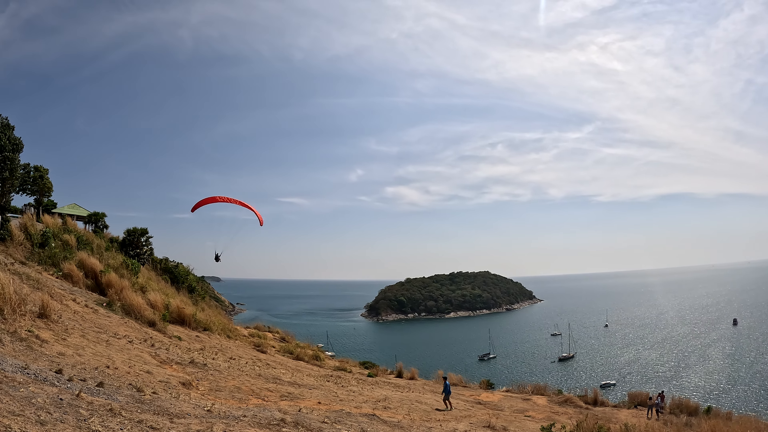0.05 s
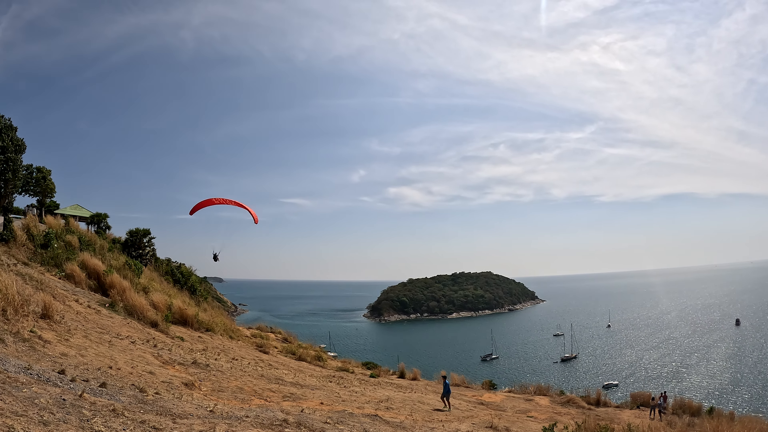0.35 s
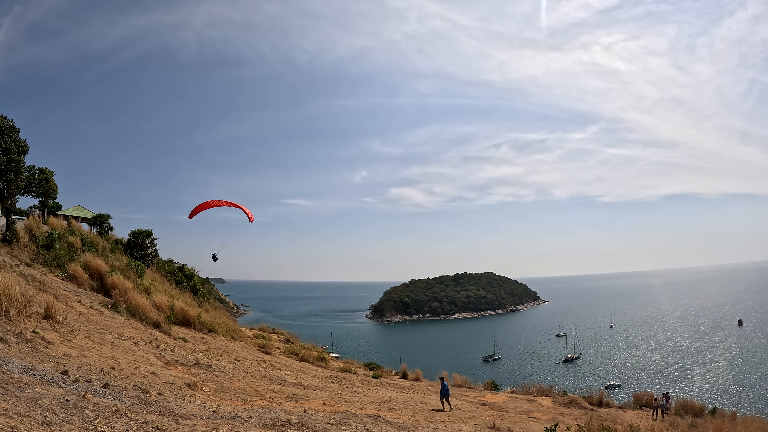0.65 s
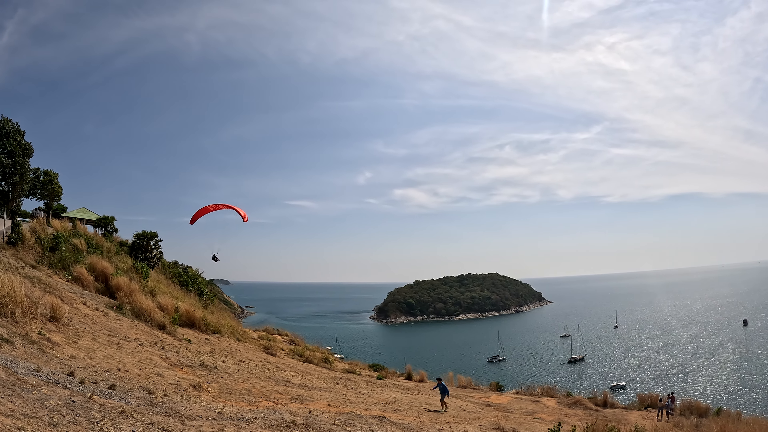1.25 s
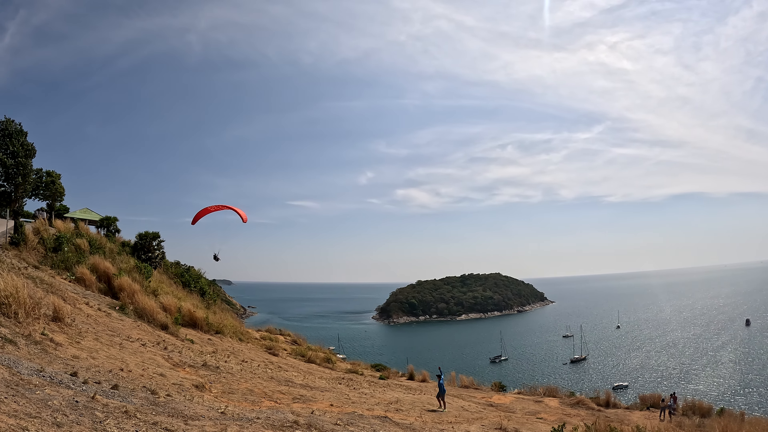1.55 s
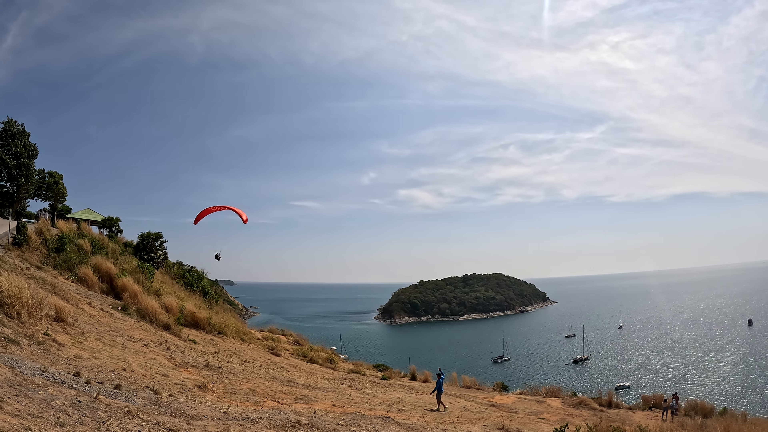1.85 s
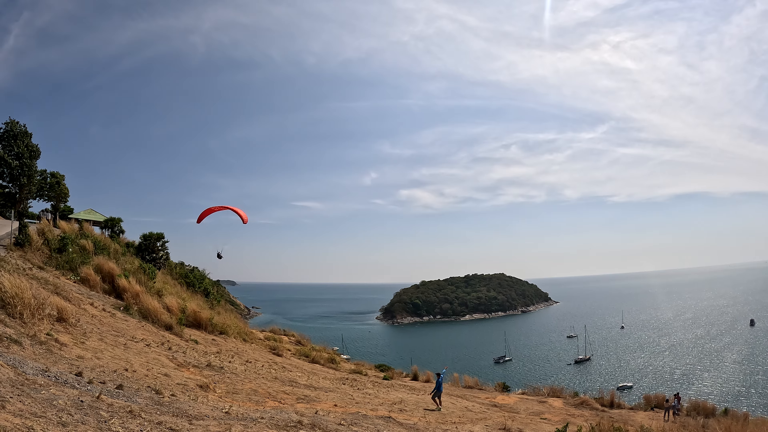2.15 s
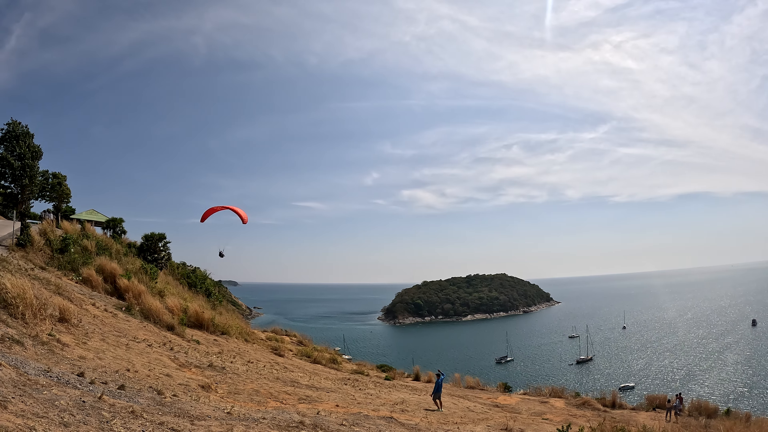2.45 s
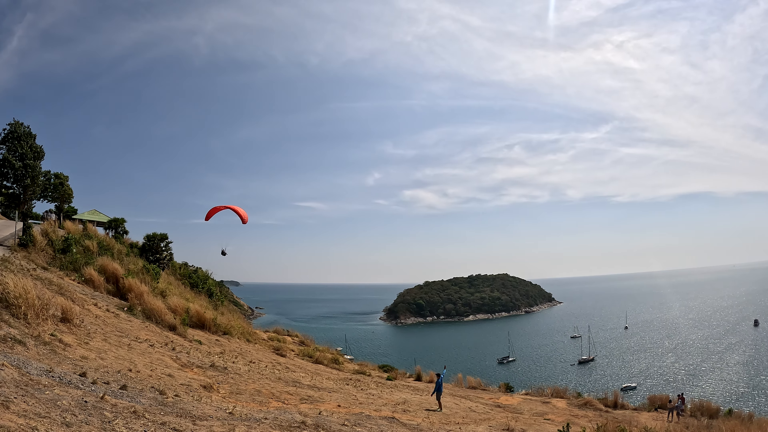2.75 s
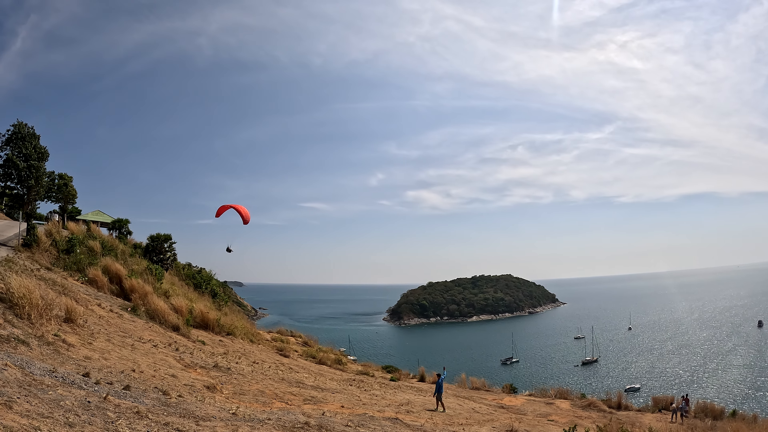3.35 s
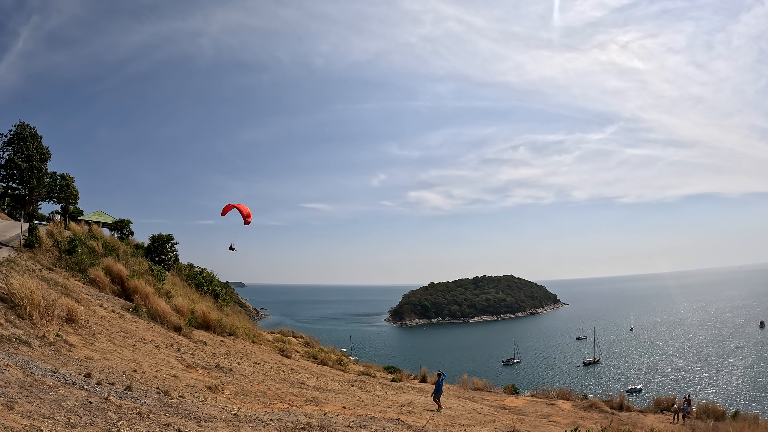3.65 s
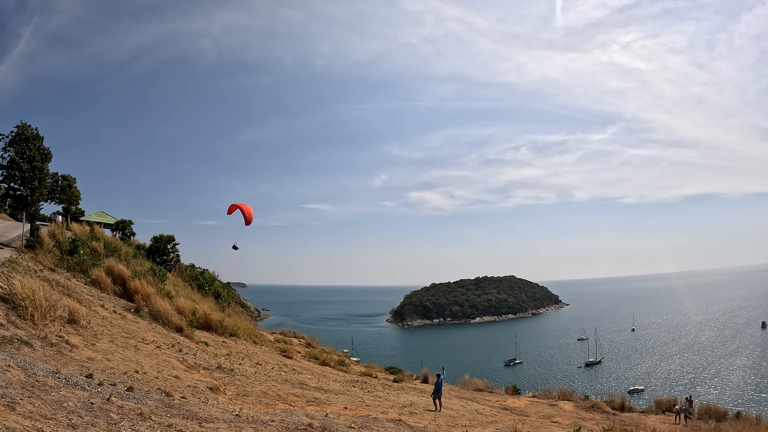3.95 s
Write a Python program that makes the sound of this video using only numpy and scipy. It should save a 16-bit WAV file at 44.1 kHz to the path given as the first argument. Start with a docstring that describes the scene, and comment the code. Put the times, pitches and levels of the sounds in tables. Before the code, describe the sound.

Low wind buffeting flutters and thumps on the microphone above a faint, distant sea hiss.

```python
"""Low, gusty wind rumble buffets a microphone on an open hillside above a bay.
Large eddies rumble at the microphone port throughout; each gust adds smaller, brighter ones
that flutter and now and then snap or thump. A faint hiss of sea and dry grass lies behind.
The cavity behind the port rings faintly, and a limiter holds the peaks down."""
import sys
import numpy as np
from scipy import signal
from scipy.io import wavfile
from scipy.ndimage import uniform_filter1d, minimum_filter1d

SR = 44100
rng = np.random.default_rng(int(sys.argv[2]) if len(sys.argv) > 2 else 0)


def inscribe(sig):
    """Save sig as 16-bit PCM at rate SR to the path in sys.argv[1].

    A 1-D sig is mono; a 2-D sig holds one channel per row.
    Samples are clipped to [-1, 1] before scaling.
    """
    pcm = np.round(np.clip(np.atleast_2d(sig).T, -1, 1) * 32767)
    wavfile.write(sys.argv[1], SR, pcm.astype(np.int16))


N = 176400
SNAP_RISE_S = 0.00143


def from_db(db):
    """Decibels to gain."""
    return 10 ** (np.asarray(db) / 20)


def unit_rms(x):
    """Scale to unit rms."""
    return x / np.sqrt(np.mean(x ** 2) + 1e-20)


def in_time(rows):
    """Interpolate (time [s], value) rows at every sample."""
    return np.interp(np.arange(N) / SR, *np.transpose(rows))


def at_hz(rows, hz):
    """Interpolate (frequency [Hz], value) rows on a log-frequency axis."""
    row_hz, values = np.transpose(rows)
    return np.interp(np.log(hz), np.log(row_hz), values)


def drift(rate_hz):
    """Smooth random curve, unit rms, computed at SR / 10."""
    pole = np.exp(-20 * np.pi * rate_hz / SR)
    white = rng.standard_normal(N // 10 + 4002)
    slow = signal.lfilter([1], [1, -2 * pole, pole * pole], white)[4000:]
    return np.interp(np.arange(N) / 10, np.arange(len(slow)), unit_rms(slow))


def bands(spectrum):
    """Yield (centre [Hz], noise) in half-octave bands across a spectrum; total power one."""
    grid_hz = 14 * 2 ** np.arange(0, 10, .5)
    centres_hz = grid_hz[(grid_hz > spectrum[0][0] / 2 ** .25) & (grid_hz < spectrum[-1][0] * 2 ** .25)]
    gains = from_db(at_hz(spectrum, centres_hz)) * np.sqrt(centres_hz)
    for hz, gain in zip(centres_hz, gains / np.linalg.norm(gains)):
        band = signal.butter(2, [hz / 1.24, hz * 1.24], "band", fs=SR, output="sos")
        white = rng.standard_normal(N + SR // 2)
        noise = signal.sosfilt(band, signal.sosfilt(band, white))[-N:]
        yield hz, gain * unit_rms(noise)


def evened(x, span_s):
    """Flatten swells slower than span_s; unit rms."""
    size = int(span_s * SR)
    power = uniform_filter1d(uniform_filter1d(x * x, size), size)
    return unit_rms(x / np.sqrt(power + 1e-12))


def large_eddies():
    """Slow pressure lumps on the port: deep rumble and low-mid buffeting."""
    # spectra: (frequency [Hz], relative density [dB])
    rumble_spectrum = [(14, -8.5), (28, 1.5), (45, 1), (75, -0.5), (110, -1), (150, -10)]
    buffet_spectrum = [(110, -7), (160, 1.5), (230, 0.5), (320, -3), (450, -9), (600, -27.5)]
    # envelopes: (time [s], relative level [dB])
    rumble_level = [(0.0, -26.5), (0.14, -19), (0.18, -32), (0.23, -21), (0.59, -25.5), (0.61, -19),
                    (0.92, -26.5), (0.93, -22), (1.38, -22.5), (1.57, -26.5), (1.78, -20), (1.81, -24.5),
                    (1.95, -19.5), (1.98, -24.5), (2.02, -17.5), (2.09, -31.5), (2.13, -22), (3.11, -22.5),
                    (3.19, -21), (3.25, -26.5), (3.32, -20), (3.36, -30.5), (3.42, -22.5), (3.88, -21.5),
                    (3.9, -26), (3.98, -16.5)]
    buffet_level = [(0.0, -21.5), (0.08, -25.5), (0.1, -18.5), (0.34, -27), (0.35, -20.5), (0.91, -18.5),
                    (1.05, -23.5), (1.14, -18), (1.16, -27.5), (1.2, -18), (1.3, -28), (1.34, -23.5),
                    (1.5, -22), (1.52, -19), (1.62, -19.5), (1.72, -20), (1.95, -19.5), (1.99, -40),
                    (2.06, -21), (2.11, -38), (2.13, -21), (2.23, -25), (2.27, -28), (2.31, -20),
                    (2.6, -22), (2.62, -20.5), (3.06, -20.5), (3.2, -20), (3.295, -26), (3.32, -21),
                    (3.36, -16.5), (3.41, -24), (3.55, -21), (3.67, -22.5), (3.74, -20.5), (3.98, -26)]
    rumble = evened(sum(noise for _, noise in bands(rumble_spectrum)), span_s=0.04)
    buffet = evened(sum(noise for _, noise in bands(buffet_spectrum)), span_s=0.05)
    return rumble * from_db(in_time(rumble_level) + 2) + buffet * from_db(in_time(buffet_level) - 0.5)


def small_eddies():
    """Brighter turbulence that follows the wind: fluttering in gusts, smoother in lulls."""
    # wind strength at the port: (time [s], relative level [dB])
    gusts = [(0.0, -38), (0.02, -26), (0.05, -42), (0.1, -34.5), (0.29, -42.5), (0.33, -33), (0.35, -42),
             (0.38, -32.5), (0.4, -41), (0.43, -33.5), (0.54, -36.5), (0.59, -31.5), (0.85, -33),
             (0.89, -37), (0.92, -32), (0.93, -42), (1.01, -30.5), (1.04, -41), (1.12, -33), (1.13, -31),
             (1.16, -45.5), (1.2, -37), (1.25, -41), (1.315, -51.5), (1.34, -39), (1.38, -38.5),
             (1.4, -44.5), (1.45, -35), (1.47, -41.5), (1.54, -32.5), (1.65, -32), (1.725, -29.5),
             (1.78, -33.5), (1.85, -36.5), (1.88, -32), (1.95, -34.5), (2.05, -40.5), (2.07, -38.5),
             (2.115, -47), (2.14, -31.5), (2.19, -33.5), (2.275, -42), (2.295, -30), (2.35, -34.5),
             (2.37, -40.5), (2.39, -34), (2.43, -30.5), (2.45, -33), (2.53, -33.5), (2.55, -42),
             (2.6, -33.5), (2.62, -35.5), (2.68, -41.5), (2.74, -38.5), (2.88, -33), (3.0, -34.5),
             (3.06, -29.5), (3.085, -31.5), (3.1, -37.5), (3.135, -46), (3.165, -33), (3.25, -35.5),
             (3.265, -44), (3.32, -42), (3.335, -33), (3.37, -28.5), (3.4, -52), (3.45, -35.5),
             (3.465, -43), (3.505, -30), (3.56, -38), (3.58, -33.5), (3.63, -33.5), (3.65, -43),
             (3.685, -42.5), (3.72, -33.5), (3.77, -31), (3.82, -36.5), (3.87, -29.5), (3.98, -31.5)]
    # spectrum at middling wind: (frequency [Hz], relative density [dB])
    spectrum = [(300, 0.5), (450, 3.5), (630, 1), (900, -7), (1300, -17), (1800, -26.5), (2600, -34.5),
                (3600, -43.5), (5000, -54)]
    # gust sensitivity: (frequency [Hz], slope [dB/dB])
    swing = [(300, 1), (550, 0.86), (900, 1.5), (1600, 1.5), (3000, 0.8), (5000, 0)]
    # flutter at middling wind and above: (frequency [Hz], depth [dB])
    flutter_depth = [(300, 1.5), (700, 5), (1500, 4), (3000, 3)]
    # treble shelf: (time [s], gain [dB])
    treble_level = [(0, 4), (.25, 3.5), (.5, -1), (.7, -0.5), (.85, -0.5), (1.5, 2), (1.65, 0.5),
                    (1.76, 5.5), (1.86, 1.5), (2.02, 4), (2.15, -1.5), (2.35, -3.5), (2.48, -4.5),
                    (2.66, -7), (2.92, -2), (3.06, 1), (3.4, 0), (3.6, -1.5), (3.73, 1.5), (3.82, -1),
                    (3.95, 2.5)]
    middling_db, base_db, flutter_db_per_db = -33.5, -25.5, 0.2
    gust_db = in_time(gusts) - middling_db
    treble_db = in_time(treble_level)
    flutter = drift(rate_hz=174)
    flutter = unit_rms(flutter - uniform_filter1d(flutter, size=1400))  # fast part only
    flutter = np.minimum(flutter, 2) * from_db(flutter_db_per_db * np.minimum(gust_db, 0))
    out = np.zeros(N)
    for hz, noise in bands(spectrum):
        flutter_gain = from_db(at_hz(flutter_depth, hz) * flutter)
        bursts = noise.std() * evened(noise * flutter_gain, span_s=.07)
        treble_share = at_hz([(1200, 0), (2000, 1)], hz)
        level_db = base_db + at_hz(swing, hz) * gust_db + treble_share * treble_db
        out += bursts * from_db(level_db)
    return out


def sea_and_grass():
    """Smooth far hiss; each band wavers slightly."""
    # hiss spectrum: (frequency [Hz], relative density [dB])
    spectrum = [(700, 13), (1500, -2.5), (2500, -8.5), (3400, -3.5), (4800, -7.5), (7000, -13), (9000, -18),
                (10500, -22)]
    # hiss envelope: (time [s], relative level [dB])
    level = [(0.06, -72), (0.13, -69), (0.35, -70), (0.77, -70), (0.8, -70), (0.83, -71.5), (1.55, -68),
             (1.6, -71.5), (2.12, -67), (2.43, -73.5), (2.85, -67.5), (2.96, -72), (3.44, -68), (3.95, -72)]
    hiss = sum(noise * from_db(0.34 * drift(rate_hz=9.7)) for _, noise in bands(spectrum))
    return hiss * from_db(in_time(level) + 14)


def puff(sos):
    """Filtered turbulence burst, a few milliseconds long; unit rms over its body."""
    t = np.arange(SR // 50) / SR
    burst = signal.sosfilt(sos, rng.standard_normal(len(t)) * t * np.exp(-t / SNAP_RISE_S))
    return burst / np.sqrt(np.sum(burst ** 2) / (2 * SNAP_RISE_S * SR))


def snaps():
    """The sharpest eddies snap across the port: a dull puff topped with thin, bright fizz."""
    # snaps: (time [s], relative puff level [dB], upper corner [Hz], relative fizz level [dB])
    events = [(0.021, -23, 2850, -66), (0.033, -24.5, 3240, -61), (0.101, -29, 2300, -64),
              (0.115, -30.5, 2000, -70), (0.335, -36, 2120, -59), (0.37, -29, 1980, -57),
              (0.434, -32.5, 1700, -72), (0.615, -22, 1410, -64), (0.676, -32, 1700, -68),
              (0.802, -28.5, 2000, -43.5), (0.835, -32, 1590, -57), (0.851, -24, 1470, -59),
              (0.856, -32, 1800, -50), (0.916, -28.5, 2000, -61.5), (0.999, -29, 1610, -61),
              (1.129, -25.5, 2180, -57), (1.14, -28.5, 1800, -59), (1.58, -33, 1690, -73),
              (1.697, -33, 2400, -58), (1.711, -29, 2380, -60), (1.726, -27, 2100, -63),
              (1.755, -24, 1900, -54), (1.892, -27.5, 2110, -62), (1.929, -33, 1700, -60),
              (2.024, -26.5, 2100, -56), (2.072, -35, 1400, -66), (2.159, -29.5, 1700, -59),
              (2.299, -30.5, 1700, -59), (2.344, -34, 1300, -70), (2.386, -31, 1280, -60),
              (2.423, -30, 1390, -72), (2.433, -26, 2090, -64), (2.471, -35, 2000, -71),
              (2.495, -27.5, 1790, -67), (2.532, -28.5, 1700, -64), (2.602, -37, 1700, -70),
              (2.764, -30.5, 1800, -61), (2.817, -31, 2000, -53), (2.877, -32, 2540, -56),
              (2.9, -31, 2200, -52), (3.066, -28, 1700, -59), (3.073, -30.5, 2250, -67),
              (3.085, -30, 1480, -67), (3.166, -36, 1400, -62), (3.201, -34, 1500, -60),
              (3.216, -28, 1700, -57), (3.25, -30.5, 1770, -59), (3.362, -32, 2100, -48),
              (3.375, -32, 2120, -46), (3.446, -29, 1690, -53), (3.506, -25.5, 1850, -43),
              (3.521, -36, 1300, -60), (3.631, -29.5, 1800, -64), (3.743, -25.5, 1590, -64),
              (3.77, -24.5, 1580, -68), (3.923, -28, 1390, -66)]
    puff_band = np.vstack([signal.butter(2, 640, "high", fs=SR, output="sos"),
                           signal.butter(1, 1750, "low", fs=SR, output="sos"),
                           signal.butter(4, 3800, "low", fs=SR, output="sos")])
    fizz_band = signal.butter(3, [3280, 4970], "band", fs=SR, output="sos")
    out = np.zeros(N + SR)
    for time_s, puff_db, corner_hz, fizz_db in events:
        dull_band = np.vstack([puff_band, signal.butter(3, corner_hz, "low", fs=SR, output="sos")])
        snap = from_db(puff_db - 4) * puff(dull_band) + from_db(fizz_db - 6.5) * puff(fizz_band)
        start = max(int((time_s - SNAP_RISE_S) * SR), 0)
        out[start:start + len(snap)] += snap
    return out[:N]


def thumps():
    """Heavy eddies shove the port for a few low cycles each."""
    # thumps: (time [s], relative peak [dB], frequency [Hz])
    events = [(0.366, -17, 260), (0.689, -17, 290), (0.796, -16.5, 280), (1.572, -18, 220),
              (2.406, -24, 220), (2.88, -19.5, 300), (3.09, -17, 260), (3.178, -11, 240),
              (3.217, -14.5, 240), (3.332, -13, 220)]
    sigma_s = 0.0044
    t, out = np.arange(N) / SR, np.zeros(N)
    for time_s, peak_db, hz in events:
        envelope = from_db(peak_db + 2) * np.exp(-.5 * ((t - time_s) / sigma_s) ** 2)
        out += envelope * np.sin(2 * np.pi * (hz * t + rng.random()))
    return out


def port_cavity(x, resonance_hz=3450):
    """The cavity behind the port rings, lifting a narrow treble band."""
    return x + 0.36 * signal.lfilter(*signal.iirpeak(resonance_hz, Q=8.9, fs=SR), x)


def scene():
    """Wind on the port over the far hiss; mono."""
    wind = large_eddies() + thumps() + small_eddies() + snaps()
    return port_cavity(wind + sea_and_grass())[None]


def record(dry):
    """Fast look-ahead limiter, then a steep low-pass."""
    limit_db, release_db_per_s, attack_s, stopband_hz = -6.5, 90, .002, 11800
    window = int(2 * attack_s * SR)
    over_db = np.maximum(20 * np.log10(np.abs(dry[0]) + 1e-9) - limit_db, 0)
    release_db = release_db_per_s * np.arange(N) / SR
    held_db = np.maximum.accumulate(over_db + release_db) - release_db
    gain_db = uniform_filter1d(minimum_filter1d(-held_db, window), window)
    lowpass = signal.cheby2(12, 60, stopband_hz, fs=SR, output="sos")
    return signal.sosfilt(lowpass, dry * from_db(gain_db))


dry = scene()
out = record(dry)
inscribe(out)
```